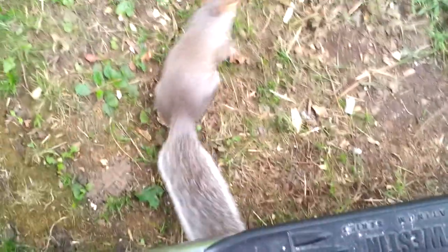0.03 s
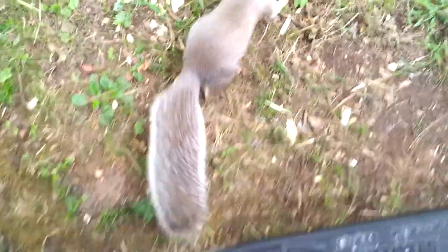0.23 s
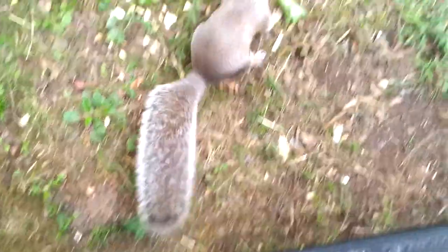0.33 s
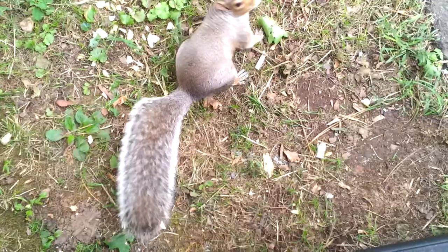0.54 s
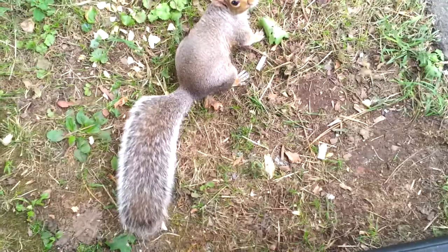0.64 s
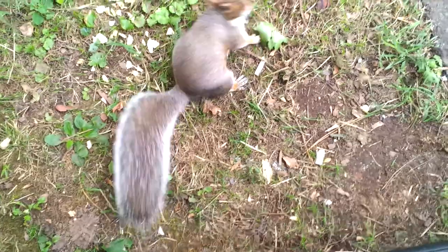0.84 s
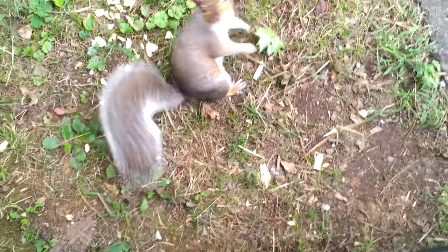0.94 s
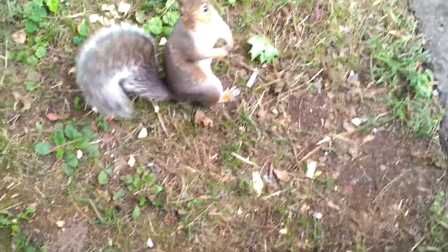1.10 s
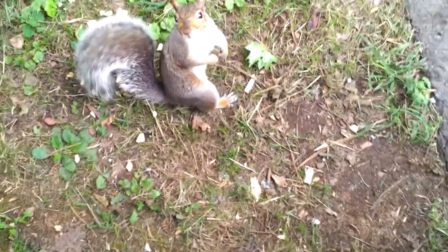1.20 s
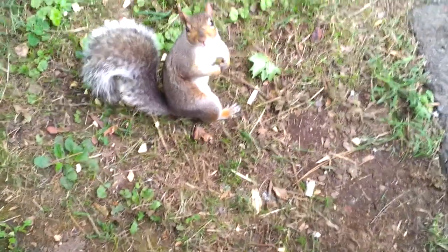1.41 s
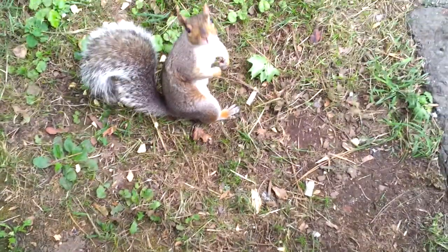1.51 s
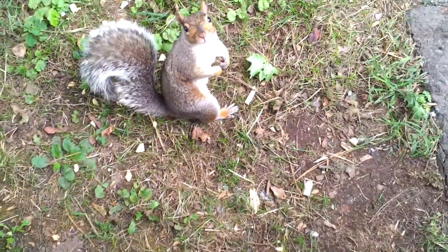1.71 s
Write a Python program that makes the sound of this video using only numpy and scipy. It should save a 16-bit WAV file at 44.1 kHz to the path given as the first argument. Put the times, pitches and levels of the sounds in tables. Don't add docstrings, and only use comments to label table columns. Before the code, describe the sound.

A nearby small bird chirps at 0.2 seconds, a piercing upward whistle that quickly falls. Two rougher chirps run together from 0.46 to 0.68, and a last, slightly lower one comes at 1.12 to 1.24. Each leaves a short yard echo. A squirrel faintly rustles grass with tiny snaps, fading out; weak distant bird calls follow after 1.5, over soft air and low traffic hum.

```python
import sys
import numpy as np
from scipy import signal
from scipy.fft import rfft, irfft
from scipy.io import wavfile
from scipy.ndimage import uniform_filter1d, minimum_filter1d

SR = 44100
rng = np.random.default_rng(int(sys.argv[2]) if len(sys.argv) > 2 else 0)


def magnitude_from_level(level_db):
    exponent = np.asarray(level_db, float) / 20
    return 10 ** exponent


def bounce(signal):
    frames = np.transpose(np.atleast_2d(signal))
    limited = np.clip(frames, -1, 1)
    pcm = np.round(limited * 32767).astype(np.int16)
    wavfile.write(sys.argv[1], SR, pcm)


N = 77175
T = np.arange(N) / SR

# time in seconds, level in dB.
RUSTLE = [
    (0, -51.5),
    (.11, -53),
    (.15, -40.5),
    (.3, -47),
    (.42, -53.5),
    (.75, -50.5),
    (.88, -50),
    (.93, -58.5),
    (1.75, -95),
]
# start in seconds, level in dB, pitch in Hz.
STALK_SNAPS = [
    (.06, -28, 7940),
    (.41, -31, 6540),
    (.72, -29, 10500),
    (1.02, -31, 6650),
    (1.289, -37, 7600),
    (1.54, -33, 6300),
]
# frequency in Hz, density in dB per Hz.
AIR_COLOUR = [(180, -50), (300, -4), (514, -7.5), (563, -7), (1010, 0), (2830, -13.5), (3560, -14),
              (5820, -12), (11800, -25.5), (15300, -57), (22000, -120)]
# frequency in Hz, density in dB per Hz.
TRAFFIC_COLOUR = [(12, -53.5), (20, -59), (34, -11), (54, -6), (102, -8.5), (128, -10), (193, -9),
                  (216, -14), (300, -21.5), (390, -50), (660, -120)]
# start in seconds, length in seconds,
# start pitch in Hz, end pitch in Hz, level in dB.
SECOND_VOICE = [
    (.182, 0.022, 5350, 5150, -28),
    (.456, 0.034, 6450, 5600, -31),
    (.562, 0.028, 5350, 5680, -37),
]
# time in seconds, pitch in Hz, fundamental in dB,
# third partial in dB, second partial in dB.
CHIRP_1 = [
    [(0.184, 2126, -58, -38, -49), (0.1985, 2199, -51, -28.5, -48), (0.2035, 2514, -51, -51, -23),
     (0.206, 2604, -49, -57, -25), (0.211, 3275, -31.5, -58, -15), (0.217, 4427, -17.5, -70, -48),
     (0.2205, 4688, -6.5, -64, -50), (0.222, 4445, -10, -69, -46), (0.2255, 3742, -36, -65, -39)],
    [(0.227, 3715, -24, -37, -28), (0.234, 3678, -25.5, -37, -26), (0.2375, 3720, -15, -52, -36),
     (0.2395, 3623, -31, -48, -29), (0.2445, 2479, -35, -38, -32), (0.2465, 2340, -50, -36, -18),
     (0.249, 2448, -37, -34, -38), (0.253, 2735, -26, -56, -51), (0.2545, 2810, -29, -50, -38)],
    [(0.256, 2920, -30, -59, -35), (0.2575, 3014, -30, -57, -25.5), (0.2675, 3060, -19.5, -52, -25),
     (0.281, 3076, -25.5, -43, -43), (0.2865, 2907, -29, -48, -44), (0.2915, 2374, -34, -49, -36),
     (0.298, 2150, -41, -48, -42), (0.313, 2126, -44, -55, -36), (0.315, 2160, -52, -47, -42)],
]
CHIRP_2 = [
    [(0.458, 2060, -56, -44, -57), (0.471, 2146, -46, -33, -54), (0.4855, 2336, -50, -38, -29),
     (0.488, 2570, -46, -29, -31), (0.489, 2690, -50, -37, -21), (0.491, 2955, -50, -55, -16),
     (0.4925, 3180, -40, -52, -14), (0.4945, 3468, -29, -41, -31), (0.5005, 3860, -17, -54, -24)],
    [(0.502, 3920, -35, -42, -39), (0.503, 3840, -24.5, -47, -33), (0.5135, 3085, -37, -42, -14),
     (0.515, 3190, -38, -43, -15), (0.5165, 3396, -25, -56, -26), (0.519, 3625, -13.5, -69, -34),
     (0.5215, 3165, -27, -56, -19), (0.527, 2295, -51, -28, -22), (0.5285, 2340, -47, -36, -16)],
    [(0.53, 2390, -50, -41, -31), (0.532, 2730, -44, -50, -32.5), (0.533, 2870, -52, -65, -35),
     (0.5375, 2817, -35.5, -54, -28), (0.5395, 2824, -46, -57, -25), (0.559, 2814, -35, -63, -31),
     (0.565, 2784, -36, -55, -37), (0.5715, 2680, -45, -54, -32), (0.575, 2600, -56, -46, -34)],
]
CHIRP_3 = [
    [(0.568, 2300, -36, -34, -39), (0.573, 2350, -43, -30, -37), (0.584, 2423, -40, -28, -27),
     (0.59, 2582, -53, -31, -15.5), (0.5915, 2636, -54, -39, -12), (0.593, 2880, -52, -50, -23),
     (0.5955, 3257, -43, -47, -12.5), (0.597, 3418, -30, -39, -15.5), (0.605, 4244, -21, -70, -36)],
    [(0.6065, 4453, -17, -70, -29.5), (0.614, 3670, -21.5, -52, -21.5), (0.6195, 3653, -17.5, -41, -24.5),
     (0.6235, 3660, -19, -41, -40), (0.625, 3396, -26, -57, -14), (0.6275, 2718, -38, -46, -23),
     (0.6305, 2418, -39, -34, -13), (0.632, 2380, -41, -39, -13.5), (0.634, 2916, -34, -54, -33)],
    [(0.6355, 2928, -33, -41, -24), (0.6425, 3100, -32.5, -46, -33), (0.6495, 2982, -40, -51, -35),
     (0.6535, 3100, -26.5, -44, -46), (0.656, 3073, -31.5, -62, -32), (0.661, 2760, -24.5, -49, -33),
     (0.666, 2840, -30, -52, -34), (0.672, 2505, -40, -50, -39), (0.685, 2410, -45, -55, -51)],
]
CHIRP_4 = [
    [(1.121, 1848, -68, -57, -55), (1.1235, 1862, -49.5, -49, -48), (1.141, 1902, -42, -26.5, -44.5),
     (1.151, 2039, -44.5, -16.5, -33), (1.1565, 2532, -43, -45, -31), (1.1585, 2874, -37, -36, -14),
     (1.161, 3207, -43, -33, -8), (1.1625, 3270, -30.5, -41, -32), (1.166, 3544, -34, -45, -34)],
    [(1.1675, 3697, -34, -47, -22), (1.1745, 3413, -34, -48, -40), (1.179, 3170, -33, -42, -13),
     (1.1815, 3178, -35, -43, -15.5), (1.1855, 3304, -31, -63, -48), (1.188, 3056, -33, -39, -15.5),
     (1.194, 2126, -49, -32, -29), (1.196, 2400, -49, -58, -30), (1.197, 2580, -42, -40, -43)],
    [(1.1985, 2740, -21, -34, -15), (1.2005, 2760, -39, -46, -23), (1.2045, 2720, -31, -45, -22),
     (1.209, 3035, -36, -45, -24), (1.212, 2780, -32, -51, -22.5), (1.22, 2740, -31, -48, -34.5),
     (1.2255, 2430, -39.5, -51, -37), (1.231, 2100, -49, -44, -45), (1.237, 2070, -57, -55, -53)],
]
CHIRP_ROUGHNESS = [
    (.9, 1.4),
    (1.2, 3.4),
    (1.0, 2),
    (1.1, 2.3),
]
# frequency in Hz, width in Hz, gain in dB.
RESONANCES = [(4600, 400, 1), (6250, 600, 1)]
# start in seconds, length in seconds, start pitch in Hz,
# end pitch in Hz, level in dB.
FAR_BIRDS = [
    (.37, .045, 6200, 7200, -52),
    (1.515, .075, 3900, 3550, -49),
    (1.72, .04, 5200, 5600, -55),
]
# delay in seconds, level in dB.
ECHOES = [
    (.015, -22),
]
# centre in seconds, low edge in Hz, high edge in Hz,
# level in dB.
SIDE_PUFFS = [
    (.545, 5600, 7700, -30),
    (1.103, 4200, 5800, -62),
    (1.382, 6300, 8300, -64),
]

TOP_HZ = 11900


def band(x, hz, width_hz):
    return signal.lfilter(*signal.iirpeak(hz, hz / width_hz, SR), x)


def walk(rate_hz):
    hold = int(SR / rate_hz)
    drift = np.repeat(rng.standard_normal(N // hold + 2), hold)
    drift = uniform_filter1d(uniform_filter1d(drift, hold), hold)[:N]
    return drift / drift.std()


def grass():
    hz, width_hz, grains_per_s, spread_db = 5870, 5100, 2200, 2
    hit = rng.random(N) < grains_per_s / SR
    grains = hit * rng.standard_normal(N) * magnitude_from_level(spread_db * rng.exponential(size=N))
    grains = band(band(grains, hz, width_hz), hz, width_hz)
    level_db = np.interp(T, *np.array(RUSTLE).T) + 1.96 * walk(26.4)
    out = grains / grains.std() * magnitude_from_level(level_db)
    noise = rng.standard_normal(N)
    snap_t60_s = 0.0095
    for start, db, snap_hz in STALK_SNAPS:
        decay = magnitude_from_level(db - 60 * np.maximum(T - start, 0) / snap_t60_s)
        out = out + band(noise * (T >= start) * decay, snap_hz, .35 * snap_hz)
    return out


def bed(colour, level_db, flicker_db, flicker_hz):
    points = np.array(colour)
    f = np.arange(N // 2 + 1) * SR / N + 1e-3
    shape_db = np.interp(np.log(f), np.log(points[:, 0]), points[:, 1])
    low_hz, high_hz = points[0, 0], points[-1, 0]
    spec = rfft(rng.standard_normal(N)) * magnitude_from_level(shape_db)
    spec *= (f >= low_hz) & (f < high_hz)
    place = 2 * np.log2(f)
    out = 0
    for k in range(int(2 * np.log2(low_hz)), int(2 * np.log2(high_hz)) + 2):
        part = irfft(spec * np.clip(1 - abs(place - k), 0, 1), N)
        out = out + part * magnitude_from_level(flicker_db * walk(flicker_hz))
    return out * magnitude_from_level(level_db) / out.std()


def engine_hum():
    hz = 54 * (1 + 0.039 * walk(5))
    return magnitude_from_level(-47.5 + 2.0 * walk(4.4)) * np.sin(2 * np.pi * np.cumsum(hz) / SR)


def glides(table):
    out = 0
    for start, length, from_hz, to_hz, db in table:
        u = np.clip((T - start) / length, 0, 1)
        hz = (from_hz + (to_hz - from_hz) * u) * (1 + .018 * walk(200))
        tone = np.sin(2 * np.pi * np.cumsum(hz) / SR)
        out = out + magnitude_from_level(db + 4.7 * walk(153)) * np.sin(np.pi * u) * tone
    return out


def chirp(notes, roughness):
    fourth_db, top_hz = -15, 9450
    flutter_db, flutter_hz, waver = 1.6, 250, .005
    breath_db, breath_width_hz = -17, 1800
    s, *columns = np.vstack(notes).T
    hz, first, third, second = (uniform_filter1d(np.interp(T, s, c), size=36) for c in columns)
    last_note_s = notes[-1][0][0]
    rough = uniform_filter1d(np.where(T < last_note_s, *roughness), size=200)
    third = third - np.maximum(3 * hz - top_hz, 0) / 200
    fourth = third + fourth_db - np.maximum(4 * hz - top_hz, 0) / 50
    gate = np.clip(np.minimum(T - s[0], s[-1] - T) / .005, 0, 1)
    phase = 2 * np.pi * np.cumsum(hz * (1 + waver * rough * walk(300))) / SR
    out = 0
    for k, db in enumerate([first, second, third, fourth], start=1):
        haze = magnitude_from_level(breath_db) * rough * (walk(breath_width_hz) + 1j * walk(breath_width_hz))
        partial = ((1 + haze) * np.exp(1j * k * phase)).imag
        out = out + magnitude_from_level(db + flutter_db * rough * walk(flutter_hz)) * partial
    return np.sqrt(2) * magnitude_from_level(-0.24) * gate * out


def sparrow():
    chirps = [CHIRP_1, CHIRP_2, CHIRP_3, CHIRP_4]
    bird = sum(chirp(*c) for c in zip(chirps, CHIRP_ROUGHNESS))
    return bird + sum((magnitude_from_level(db) - 1) * band(bird, hz, width) for hz, width, db in RESONANCES)


def yard(x):
    t = T[:SR // 2]

    def tail(db, t60_s):
        unit_energy = np.sqrt(2 * np.log(1000) / t60_s / SR)
        return magnitude_from_level(db - 60 * t / t60_s) * rng.standard_normal(len(t)) * unit_energy

    room = (tail(-11.5, .26) + tail(-27, .5)) * np.clip(t / .004, 0, 1)
    echoes = sum(magnitude_from_level(db) * np.roll(x, int(delay * SR)) for delay, db in ECHOES)
    leaf_stir = (1 + walk(150)) / np.sqrt(2)
    return x + echoes + leaf_stir * signal.fftconvolve(x, room)[:N]


def phone_processing(x):
    smear_db, smear_width_hz = -8.5, 1700
    fill_hz, fill_db = 10070, -5.5
    drop_db, drop_spread_db, treble_drop_db, treble_hz = -48, 5, 15, 8300
    settings = dict(nperseg=2048, noverlap=1024, window="cosine")
    f, _, z = signal.stft(x, SR, **settings)
    power = uniform_filter1d(abs(z) ** 2, size=max(int(smear_width_hz / f[1]), 1), axis=0)
    power += (f > fill_hz)[:, None] * power.mean(axis=0) * magnitude_from_level(2 * fill_db)
    hiss = np.sqrt(power) * magnitude_from_level(smear_db) * np.exp(2j * np.pi * rng.random(z.shape))
    group = (12 * np.log2(1 + f / 400)).astype(int)
    energy = np.array([(abs(z[group == g]) ** 2).sum(axis=0) for g in range(group.max() + 1)])
    mid_hz = 400 * (2 ** ((np.arange(len(energy)) + .5) / 12) - 1)
    treble_db = treble_drop_db * (mid_hz > treble_hz) * (mid_hz < fill_hz)
    limit_db = drop_db + treble_db[:, None] + drop_spread_db * rng.standard_normal(energy.shape)
    limit = energy.max(axis=0) * magnitude_from_level(2 * limit_db)
    keep = np.where(energy > limit, 1, .04)[group] * (f < TOP_HZ)[:, None]
    return signal.istft((z + hiss) * keep, SR, **settings)[1][:N]


def limiter(x):
    ceiling = .72
    peak = -minimum_filter1d(-abs(x), size=60)
    return x * uniform_filter1d(np.minimum(ceiling / (peak + 1e-9), 1), size=60)


def side_noise():
    puff_s = .046
    noise, out = rng.standard_normal(N), 0
    for centre, low_hz, high_hz, db in SIDE_PUFFS:
        sos = signal.ellip(6, 1, 70, (low_hz, high_hz), "bandpass", fs=SR, output="sos")
        part = signal.sosfilt(sos, noise)
        swell = np.cos(np.pi * np.clip((T - centre) / puff_s, -.5, .5))
        out = out + magnitude_from_level(db) * part / part.std() * swell
    return out


def scene():
    birds = yard(sparrow() + glides(FAR_BIRDS) + glides(SECOND_VOICE))
    air = bed(AIR_COLOUR, -47.5, 2.08, 12.5)
    traffic = bed(TRAFFIC_COLOUR, -46.5, 0.92, 6.7) + engine_hum()
    mono = birds + grass() + air + traffic
    return np.array([mono, mono])


def band_limit(x):
    return signal.sosfilt(signal.butter(12, 11940, fs=SR, output="sos"), x)


def record(dry):
    mono = limiter(phone_processing(dry[0]))
    low_pass = signal.ellip(8, .1, 50, TOP_HZ + 150, fs=SR, output="sos")
    mono = signal.sosfiltfilt(low_pass, mono)
    side = side_noise()
    return band_limit(np.array([mono + side, mono - side]))


dry = scene()
out = record(dry)
bounce(out)
```